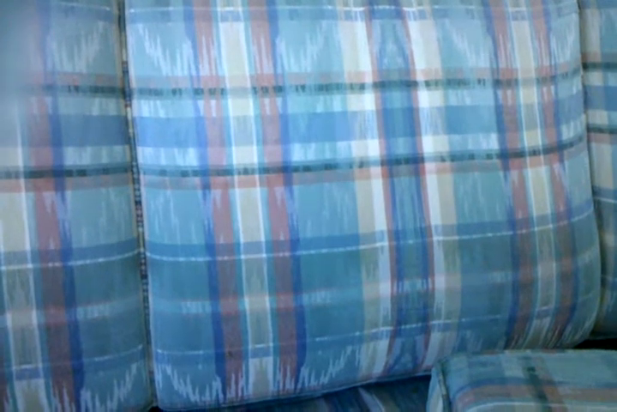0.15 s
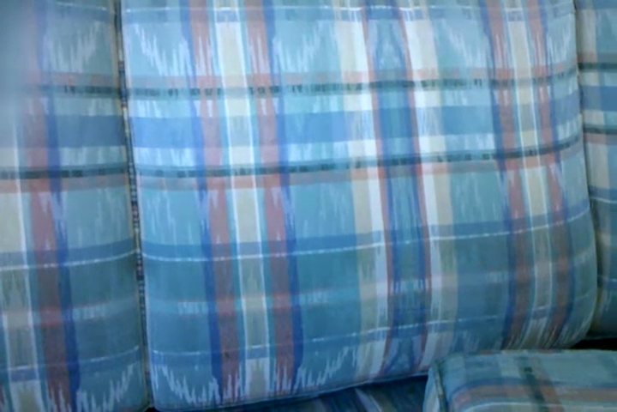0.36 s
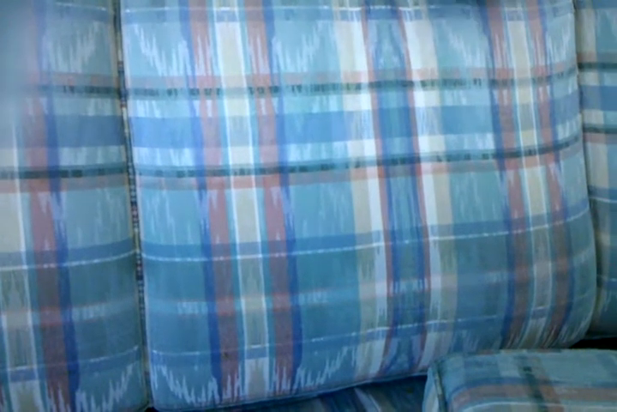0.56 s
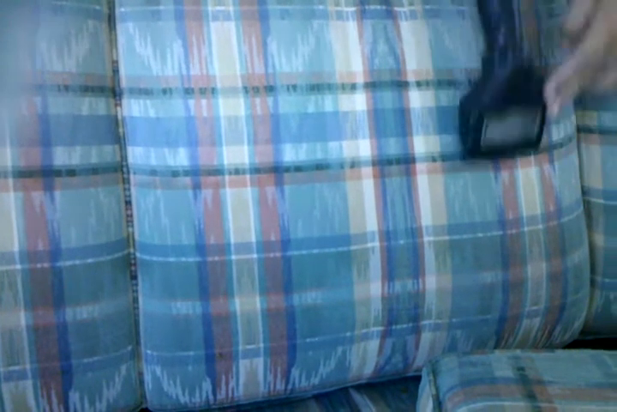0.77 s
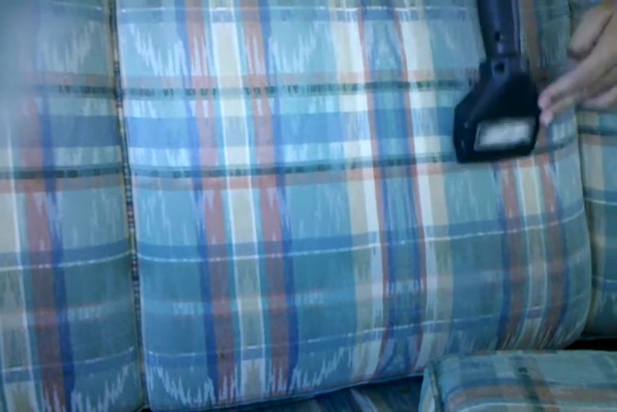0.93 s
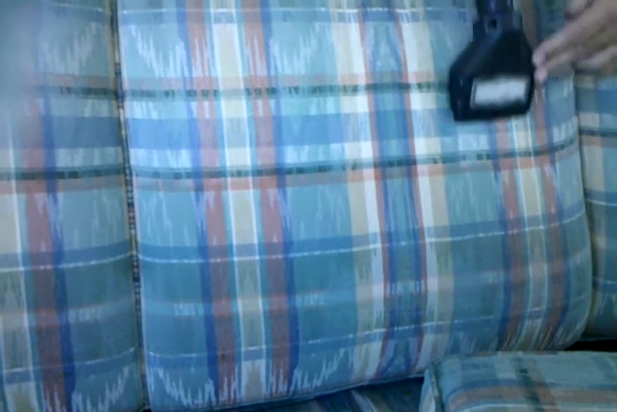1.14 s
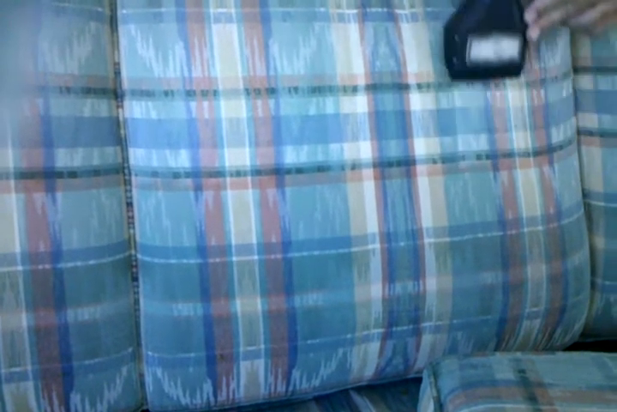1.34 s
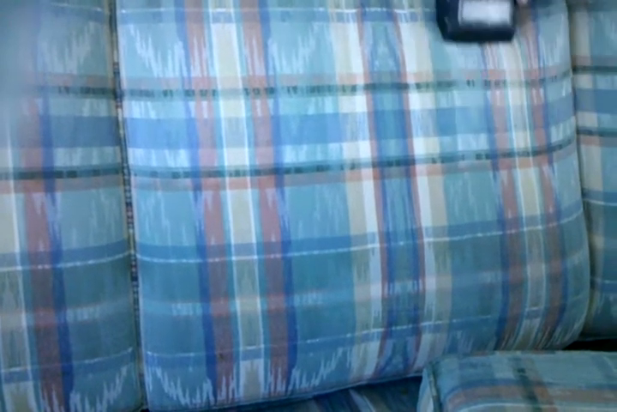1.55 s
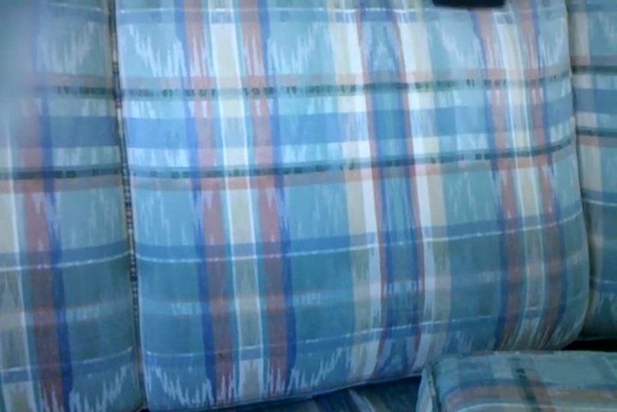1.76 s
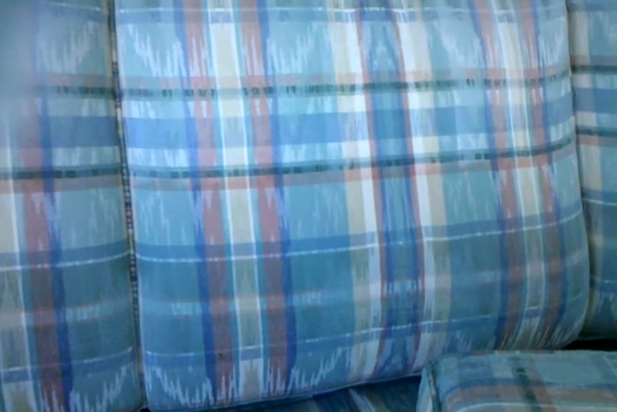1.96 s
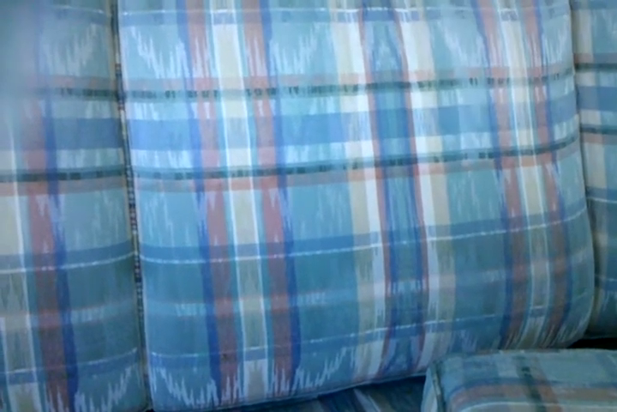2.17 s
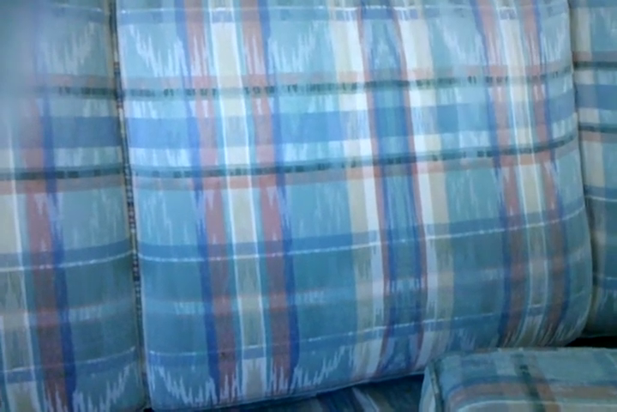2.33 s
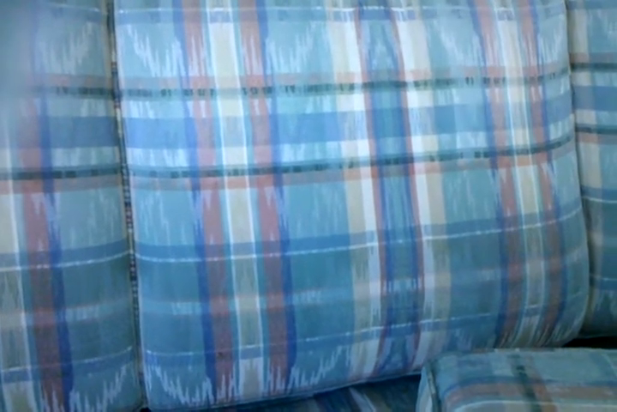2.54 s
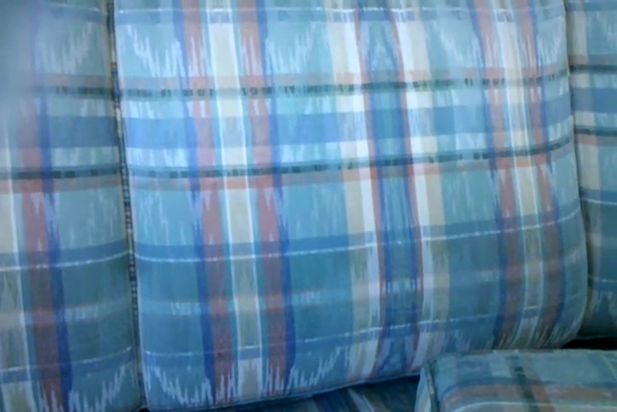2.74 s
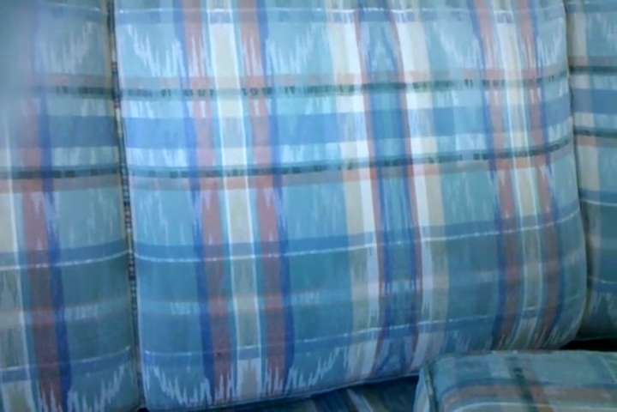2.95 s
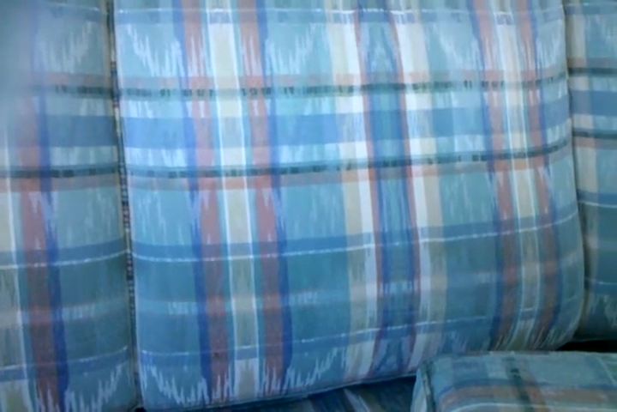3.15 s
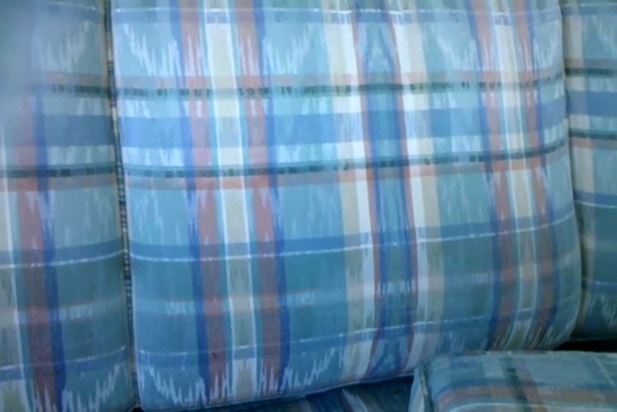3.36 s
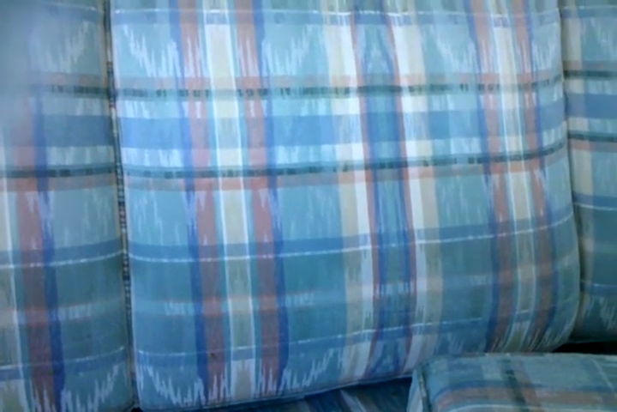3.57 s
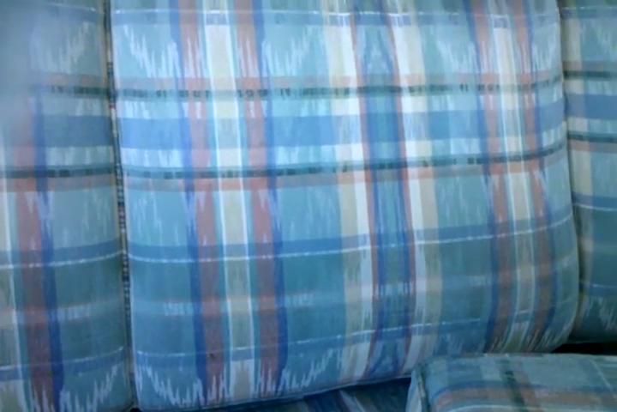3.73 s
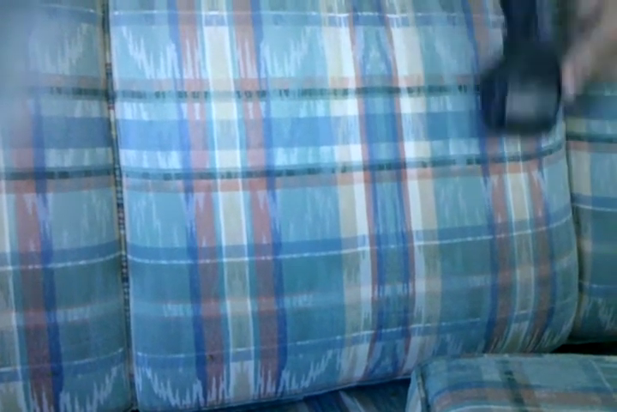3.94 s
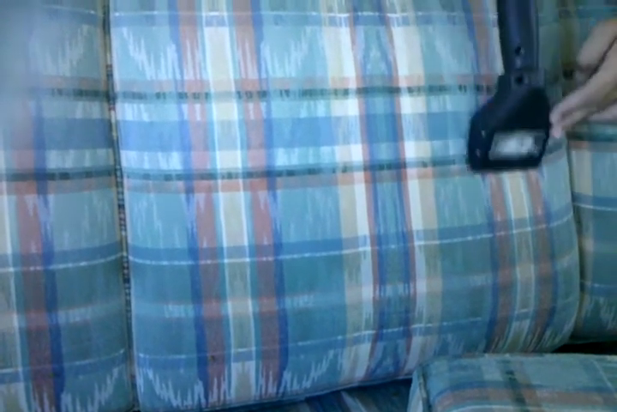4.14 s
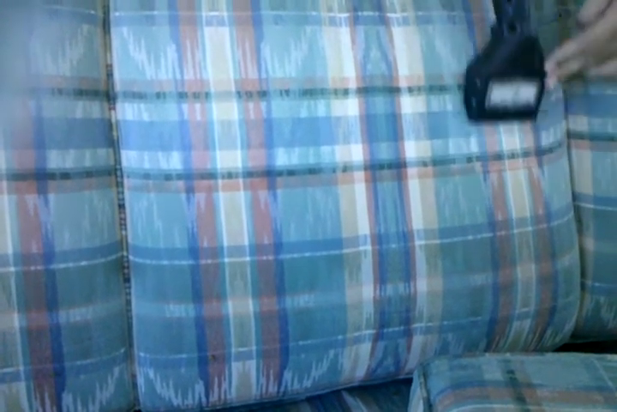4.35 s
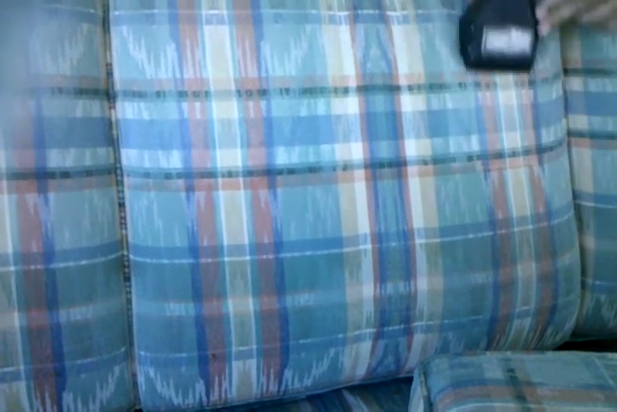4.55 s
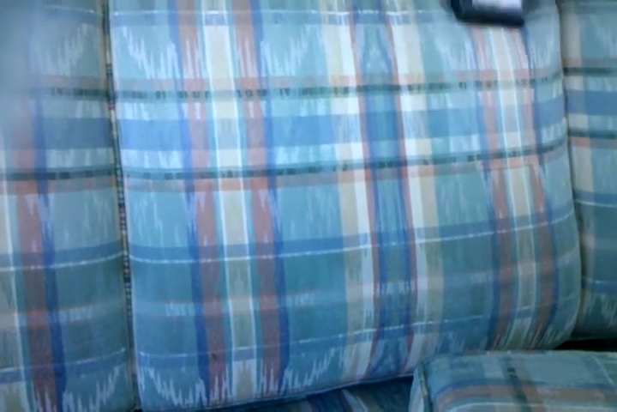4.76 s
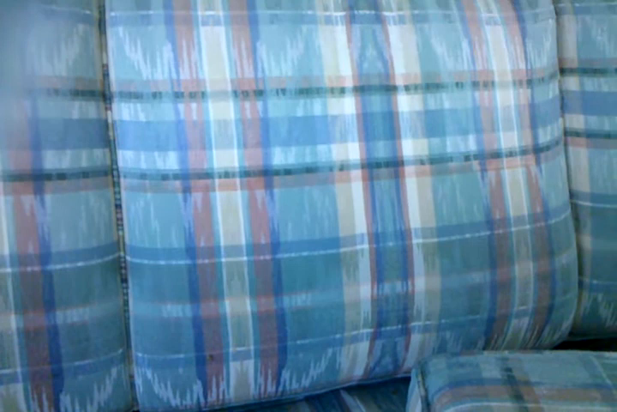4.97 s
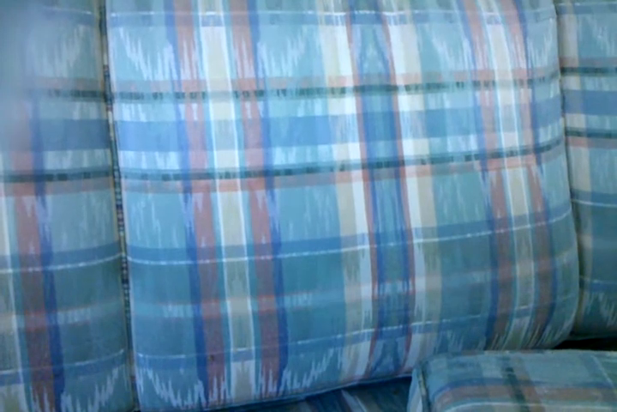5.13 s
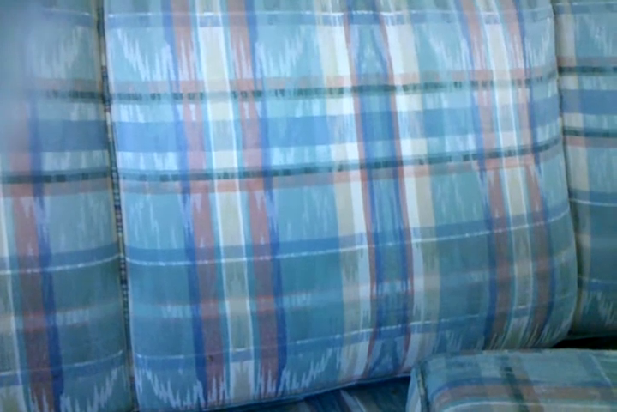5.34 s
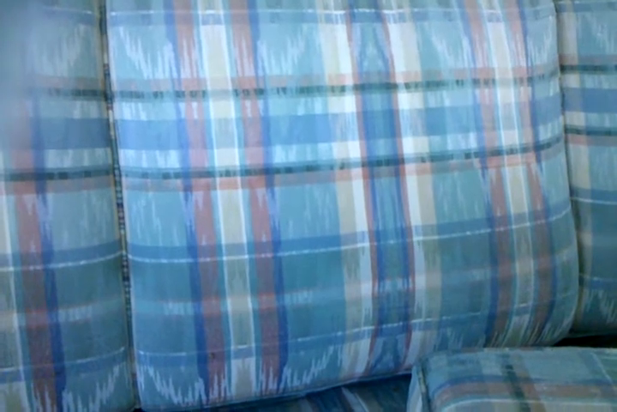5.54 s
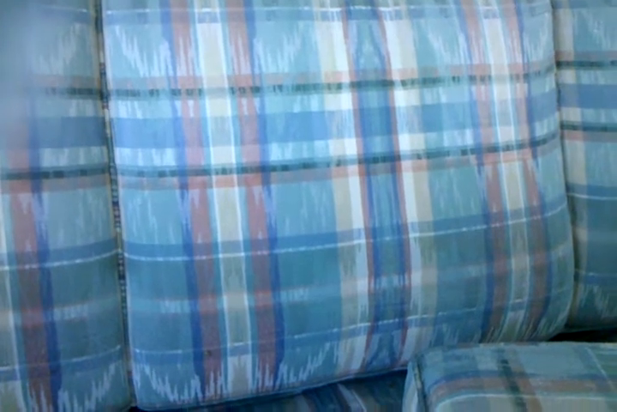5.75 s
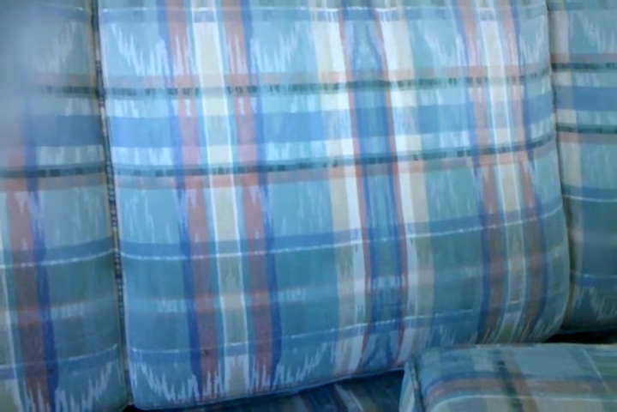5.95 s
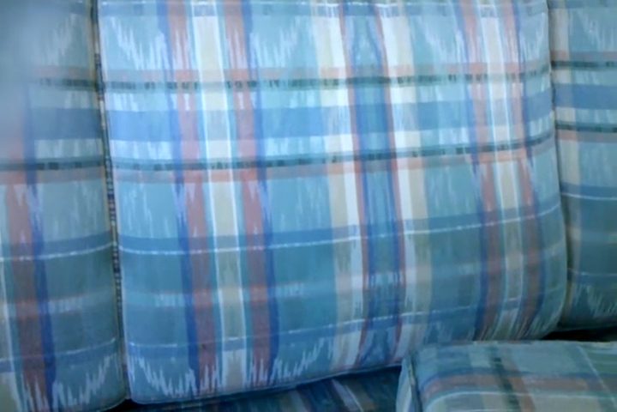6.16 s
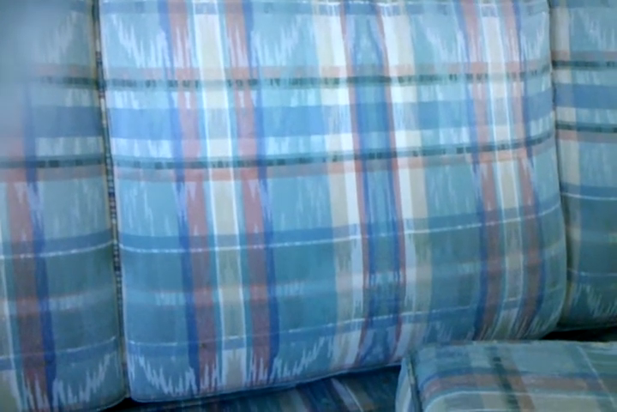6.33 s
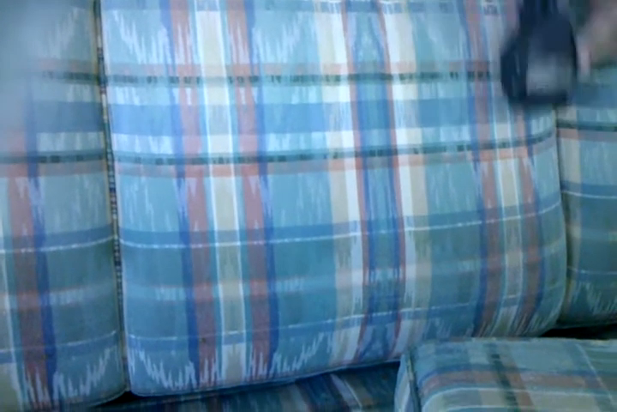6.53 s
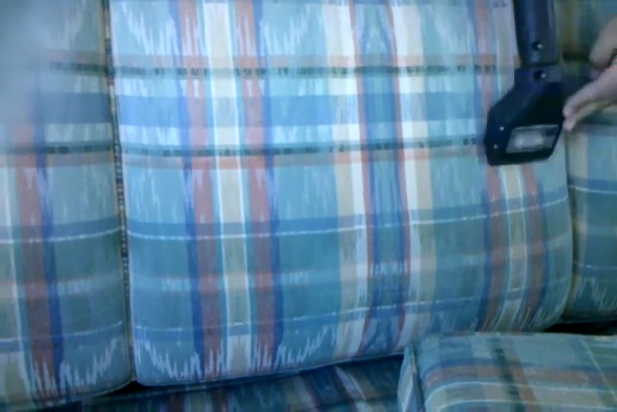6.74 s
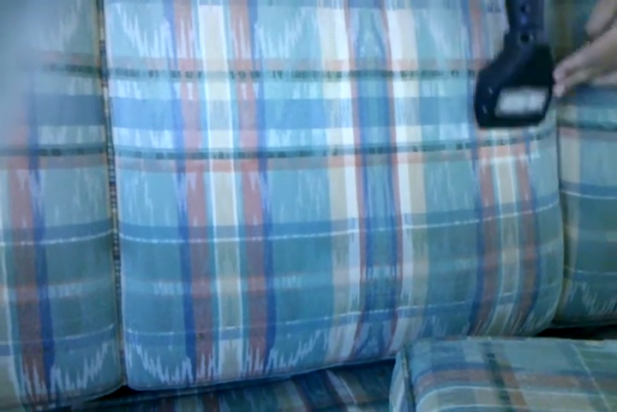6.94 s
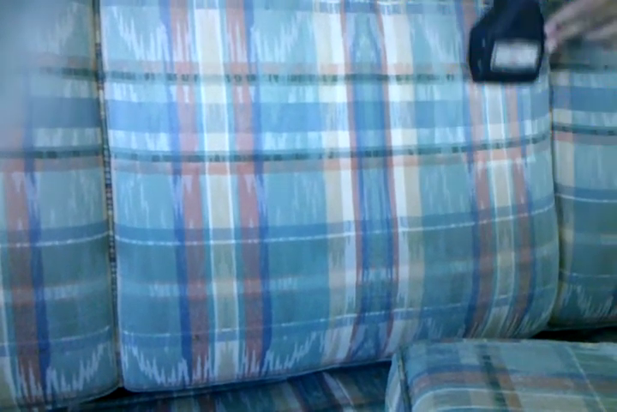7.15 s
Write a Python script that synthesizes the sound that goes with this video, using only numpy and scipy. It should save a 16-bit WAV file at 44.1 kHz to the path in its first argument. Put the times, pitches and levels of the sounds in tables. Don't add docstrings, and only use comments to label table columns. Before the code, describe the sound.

Indoors in a furnished room, a suction wand works on a cushion. A brief faint hiss gives way to a loud rush of air as it lifts, swelling until it seals with a soft thud. A steady hiss follows, thinning near its end. This repeats twice more, the last lift loudest. A distant engine and blower hum low underneath. One close microphone, slightly overloaded on the peaks, with dull top end.

```python
import sys
import numpy as np
from scipy import signal
from scipy.fft import rfft, irfft
from scipy.io import wavfile
from scipy.ndimage import uniform_filter1d

SR = 44100
rng = np.random.default_rng(int(sys.argv[2]) if len(sys.argv) > 2 else 0)


def master(y):
    cut = np.clip(np.atleast_2d(y).T, -1, 1)
    pcm = np.round(cut * 32767)
    wavfile.write(sys.argv[1], SR, pcm.astype(np.int16))


def undo_db(level):
    steps = np.asarray(level, float) / 20
    return 10 ** steps


N = 321657

HZ = np.fft.rfftfreq(1024, 1 / SR)
LIMIT_HZ = 7000


def read(points, hz):
    f, value = np.transpose(points)
    return np.interp(np.log(hz + 1), np.log(f + 1), value)


def evened(x):
    return x / np.sqrt(np.mean(x ** 2) + 1e-20)


def wander(shape, size):
    x = rng.standard_normal(shape)
    for axis, width in enumerate(size):
        x = uniform_filter1d(x, width, axis)
        x = uniform_filter1d(x, width, axis)
    return evened(x)


def eased(x):
    return .5 + .5 * np.sin(np.pi / 2 * np.clip(x, -1, 1))


def throb(t):
    rate_hz, crest_s = 15.373, 0.032
    return np.cos(2 * np.pi * rate_hz * (t - crest_s))


def frame_times(start, end):
    return np.arange(start, end + .03, 128 / SR)


def turbulence(field_db, patchy_db, flutter_db):
    real, imaginary = rng.standard_normal(field_db.shape + (2,)).T
    patches = patchy_db * wander(field_db.shape, size=(12, 5))
    flutter = flutter_db * wander((len(field_db), 1), size=(6, 1))
    z = (real + 1j * imaginary) * undo_db(field_db + patches + flutter).T
    return signal.istft(z, nperseg=1024, noverlap=896)[1] * np.sqrt(3)


def airflow(levels_db, colour_db, bands):
    lack_db = []
    for level_db, (low, high) in zip(levels_db, bands):
        power = (undo_db(colour_db[:, (HZ > low) & (HZ < high)]) ** 2).sum(1)
        lack_db.append(level_db - 10 * np.log10(power))
    centres = np.log([np.sqrt(low * high) for low, high in bands])[::-1]
    place = np.interp(np.log(HZ + 1), centres, np.arange(len(bands)))
    place = np.floor(place) + np.clip(2 * (place % 1) - .5, 0, 1)
    share = np.clip(1 - abs(place[:, None] - np.arange(len(bands))[::-1]), 0, 1)
    return colour_db + (share @ np.array(lack_db)).T


def gate(x, length, rise_s, fall_s):
    t = np.arange(len(x)) / SR
    return x * np.clip(t / rise_s, 0, 1) * np.clip((length - t) / fall_s + 1, 0, 1)


def sealed_slot(seal, dry_at, drying_s, free, db):
    # hz, density_db
    colour = [(250, -48.5), (500, -19.5), (800, -14.5), (1100, -12.5), (1400, -11), (1700, -12.5),
              (2300, -16), (2800, -14), (3200, -7), (3800, -7.5), (4900, 0.5), (5900, 1), (6600, 1.5),
              (7000, 2)]
    # low_hz, high_hz
    bands = [(4600, 7400), (2600, 4600), (600, 2600)]
    # wet_db, fade_db_per_s, dry_change_db, wet_throb_db, dry_throb_db
    layers = [
        (-32, -1.5, -4, 0.4, 1.8),
        (-35.8, -1.9, -9.5, 0.3, 3),
        (-49, -0.1, -0.3, 0.9, 1.8),
    ]
    settles = [1.5, 4, 6]
    settle_s, dry_fade_db_per_s, dry_fade_s = 0.04, -11.5, 0.68
    t = frame_times(seal, free)
    dried = eased((t - dry_at) / drying_s)
    wet_s = np.minimum(t, dry_at) - seal
    dry_s = np.clip(t - dry_at, 0, dry_fade_s)
    levels_db = []
    for (wet_db, fade_db, drop_db, calm_db, pulse_db), settle_db in zip(layers, settles):
        level = db + wet_db + fade_db * wet_s + drop_db * dried + dry_fade_db_per_s * dry_s
        level += (calm_db + (pulse_db - calm_db) * dried) * throb(t)
        levels_db.append(level + settle_db * np.exp((seal - t) / settle_s))
    leak_hz = 1140 - 110 * np.exp((seal - t) / 0.3)
    rings_db = 5 / (1 + ((HZ - leak_hz[:, None]) / 70) ** 2)
    field_db = airflow(levels_db, read(colour, np.minimum(HZ, LIMIT_HZ)) + rings_db, bands)
    noise = turbulence(field_db, patchy_db=1.34, flutter_db=0.62)
    return seal, gate(noise, free - seal, 0.0032, .012)


def machine():
    # time_s, lobe_rate_hz
    speed = [(0, 184.5), (.6, 185.5), (1.2, 186.4), (2, 184.5), (3.3, 183.6), (4, 184.8), (4.5, 186.4),
             (5.1, 185.2), (5.9, 183.1), (6.5, 185), (7, 186.7), (7.3, 186)]
    # cycle_multiple, rms_db
    engine = [(2, -87), (3, -72), (4, -68), (5, -60), (6, -51), (7, -65), (8, -67), (9, -70), (10, -63),
              (11, -64), (12, -68), (13, -62), (14, -68), (15, -73), (16, -64), (18, -70)]
    # half_lobe_multiple, rms_db
    blower = [(2, -52), (3, -68.5), (4, -52.5), (6, -69.5), (7, -66), (12, -65)]
    belt = .1269
    mains_hz, mains_db = 120, -55.5
    t = np.arange(N) / SR
    lobes = 2 * np.pi * np.cumsum(np.interp(t, *np.transpose(speed))) / SR
    orders = [(belt * k, db) for k, db in engine] + [(k / 2, db) for k, db in blower]
    breaths_db = 2.03 * wander((400, len(orders)), size=(4, 1))
    breath_times = np.linspace(0, t[-1], 400)
    hum = undo_db(mains_db) * np.sin(2 * np.pi * (mains_hz * t + .3))
    for (k, db), start, breath_db in zip(orders, rng.random(len(orders)), breaths_db.T):
        level = undo_db(db + np.interp(t, breath_times, breath_db))
        hum += level * np.sin(k * lobes + 2 * np.pi * start)
    return np.sqrt(2) * hum


def machine_air():
    # hz, gain_db
    wash = [(40, -9.5), (70, -1), (130, -0.5), (250, -4), (500, -3.5), (800, -4.5), (1120, -5.5),
            (1400, -13), (1740, -5), (2100, -9.5), (3200, -14), (3700, 1), (4300, -12.5), (6600, -6),
            (8000, -19.5)]
    hz = np.fft.rfftfreq(N, 1 / SR)
    spectrum = rfft(rng.standard_normal(N)) * undo_db(read(wash, hz))
    return undo_db(-48.5) * evened(irfft(spectrum, N))


def open_slot(free, turn, swing, seal, db, ring_db):
    # hz, density_db
    colour = [(110, -60), (175, -18.5), (240, -5.5), (330, -19.5), (400, -12), (780, -12), (850, -8),
              (1290, -8), (1450, -10.5), (2350, -6.5), (3400, -1.5), (4100, -5), (5300, 4), (7000, 5)]
    # low_hz, high_hz
    bands = [(4400, 7400), (2300, 4400), (650, 2300), (200, 650)]
    # lift_off_db, turn_gain_db, near_gain_db, surge_db, throb_db
    layers = [
        (-29.5, 9.8, 1.5, 2.5, 0.8),
        (-37.5, 5, 7.2, 3.5, 0.9),
        (-36.5, 0.3, 9.2, 3, 1.6),
        (-49, 0.3, 8, 4, 2.6),
    ]
    pops = [0.2, 0.6, 5.5, 5]
    lags = [0.9, 1.1, 1.6, 1.9]
    swings = [-2.5, -0.8, -0.3, -0.3]
    breaks = [-16, -20, -40, -30]
    break_s, pop_s, turn_s, swing_s, hush_s, surge_s = 0.045, 0.11, 0.1, 0.07, 0.11, 0.07
    near_share = 0.6
    t = frame_times(free - break_s, seal)
    way = (t - free) / (seal - free)
    near = np.clip(way / near_share, 0, 1)
    popped = np.exp(-np.maximum(t - free, 0) / pop_s)
    turned = eased((t - turn) / turn_s)
    surge = eased((t - seal) / surge_s + 1)
    aside = np.exp(-((t - swing) / swing_s) ** 2)
    aside += np.exp(-(2 * (t - seal + hush_s) / swing_s) ** 2)
    held = np.clip((free - t) / break_s, 0, 1)
    levels_db = []
    for layer, pop_db, lag, swing_db, break_db in zip(layers, pops, lags, swings, breaks):
        start_db, turn_db, near_db, surge_db, throb_db = layer
        level = db + start_db + break_db * held + pop_db * popped
        level += turn_db * turned + near_db * near ** lag
        levels_db.append(level + swing_db * aside + surge_db * surge + throb_db * throb(t))
    hose_hz = np.interp(way, [0, near_share, 1], [930, 1310, 1080])
    height_db = 2.2 + ring_db * (1 - .6 * turned) + 2.5 * popped
    height_db += 2.2 * wander(len(t), size=(14,))
    hose_db = np.clip(height_db, 0, 12)[:, None] / (1 + ((HZ - hose_hz[:, None]) / 36) ** 2)
    field_db = airflow(levels_db, read(colour, np.minimum(HZ, LIMIT_HZ)) + hose_db, bands)
    noise = turbulence(field_db, patchy_db=1.5, flutter_db=0.55)
    return t[0], gate(noise, seal - t[0], 0.011, .003)


def spit(db, length, hz, ratio):
    count = round(length * SR)
    ratio = max(ratio, 1.05)
    band = signal.butter(2, [hz / ratio, hz * ratio], 'band', fs=SR)
    air = signal.lfilter(*band, rng.standard_normal(4000))
    ragged = air * undo_db(2.5 * wander(4000, size=(60,)))
    return undo_db(db) * evened(ragged)[:count] * np.hanning(count)


def thud(db, hz, push_db):
    t = np.arange(4000) / SR
    envelope = undo_db(db - 60 * t / 0.046) * np.clip(t / 0.0035, 0, 1)
    ring = np.sin(2 * np.pi * hz * t * (1 - 2.7 * t))
    push = undo_db(push_db) * np.sin(np.pi * hz * t)
    return envelope * (ring + push)


def furnished_room(x):
    t = np.arange(300, 8000, 22) / SR
    taps = np.zeros(8100)
    places = (t * SR).astype(int) + rng.integers(0, 22, len(t))
    taps[places] = rng.choice([-1., 1.], len(t)) * undo_db(-60 * t / .1)
    taps *= undo_db(-12.5) / np.linalg.norm(taps)
    taps[0] = 1
    return signal.oaconvolve(x, taps / np.linalg.norm(taps))[:N]


def add(mix, s, sound):
    part = mix[round(s * SR):][:len(sound)]
    part += sound[:len(part)]


def scene():
    # seal_s, dry_s, drying_s, free_s, level_db
    strokes = [
        (0.0, -0.9, 0.1, 0.2, -4),
        (1.08, 2.32, 0.17, 3.42, -0.3),
        (4.32, 5.21, 0.05, 6.07, 0.1),
        (6.976, 8, 0.1, 7.29, -0.6),
    ]
    # free_s, turn_to_microphone_s, swing_aside_s, seal_s, level_db
    lifts = [
        (0.212, 0.41, 0.83, 1.084, -0.3),
        (3.432, 3.65, 3.95, 4.32, 0.5),
        (6.085, 6.21, 6.54, 6.974, 1.1),
    ]
    hose_rings = [0.6, 9, -1.2]
    # start_s, rms_db, length_s, centre_hz, width_ratio
    spits = [
        (0.2, -35, .065, 760, 1.2),
        (6.07, -38, .06, 500, 1.25),
        (2.644, -27.5, .044, 7500, 2.2),
        (5.55, -38, 0.034, 4200, 1.7),
        (1.03, -17.5, 0.057, 5300, 1.13),
        (4.27, -17.5, .055, 4800, 0.92),
        (6.93, -20, .05, 6800, 1.15),
    ]
    # start_s, peak_db, cushion_hz, push_db
    thuds = [
        (1.077, -19, 183, -1.5),
        (4.316, -17.5, 224, -7.5),
        (6.969, -20.5, 233, -21),
    ]
    mix = np.zeros(N)
    for row in strokes:
        add(mix, *sealed_slot(*row))
    for row, ring_db in zip(lifts, hose_rings):
        add(mix, *open_slot(*row, ring_db))
    for s, *rest in spits:
        add(mix, s, spit(*rest))
    for s, *rest in thuds:
        add(mix, s, thud(*rest))
    mix = furnished_room(mix) + machine() + machine_air()
    return np.array([mix, mix])


def roll_off(x):
    return signal.sosfilt(signal.butter(12, 15650, fs=SR, output="sos"), x)


def record(dry):
    # hz, gain_db
    response = [(20, -22), (50, -13), (100, 0), (6900, 1), (7300, -12), (7700, -26), (8000, -33.5),
                (8800, -34.5), (9300, -53), (9600, -90)]
    # time_s, peak_db
    overloads = [(0.596, -37), (1.0607, -36), (1.0814, -14.5), (4.2978, -28), (4.316, -22.5),
                 (6.674, -38.5), (6.9378, -26), (6.9404, -28), (6.9428, -29.5), (7.292, -44)]
    squeezed = dry / (1 + (abs(dry) / .95) ** 4) ** .25
    gain = undo_db(read(response, np.fft.rfftfreq(N, 1 / SR)))
    x = irfft(rfft(squeezed) * gain, N)
    for s, db in overloads:
        x[:, round(s * SR)] -= undo_db(db)
    return roll_off(x)


dry = scene()
out = record(dry)
master(out)
```